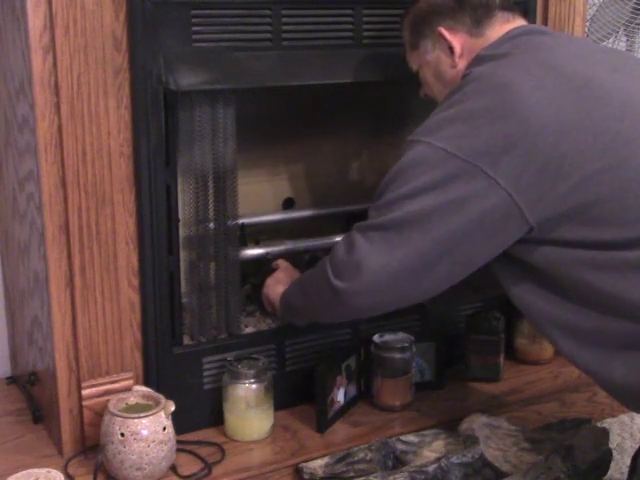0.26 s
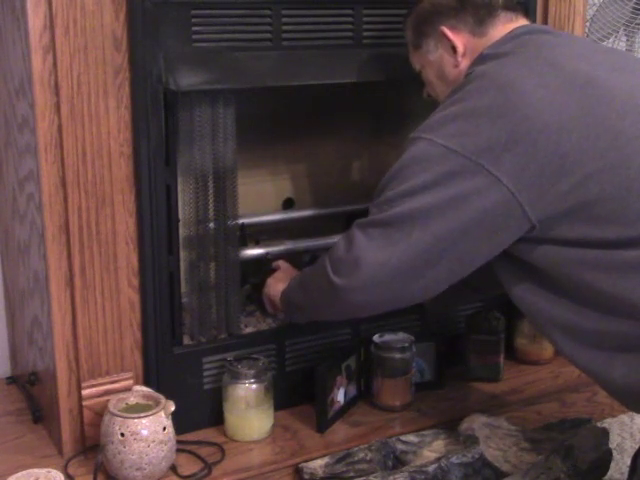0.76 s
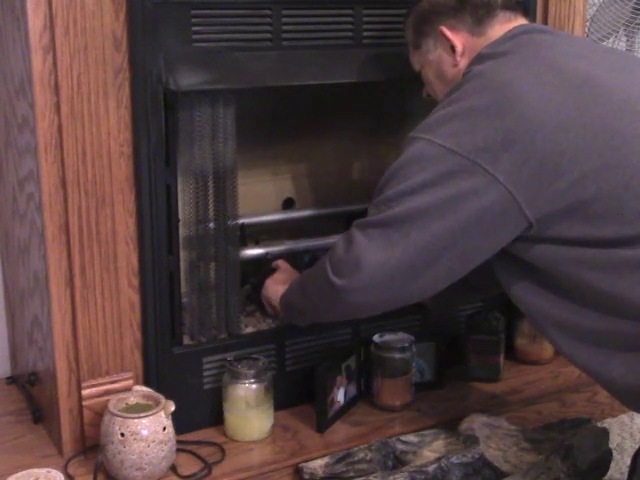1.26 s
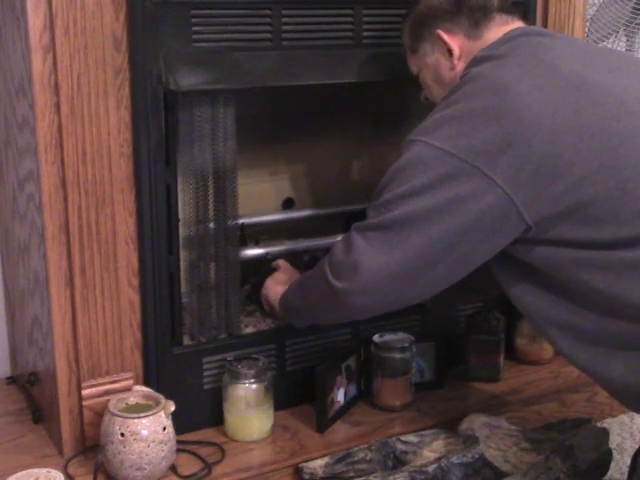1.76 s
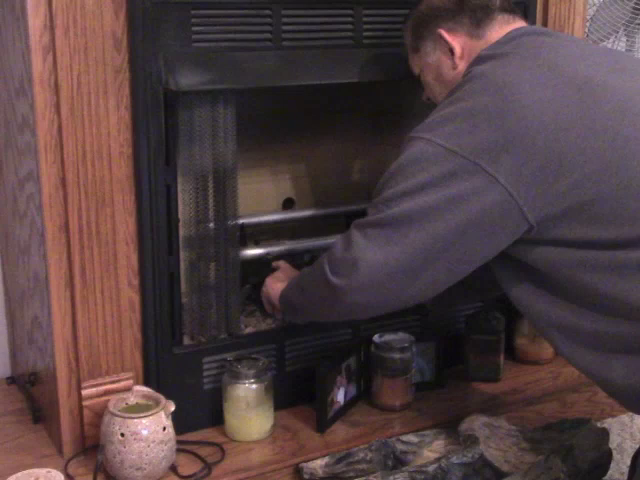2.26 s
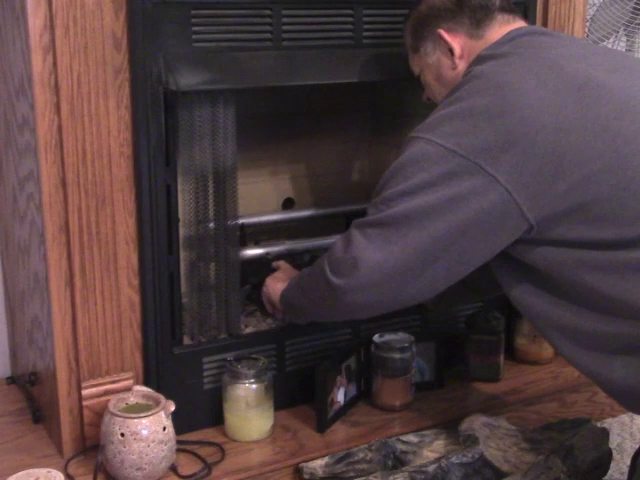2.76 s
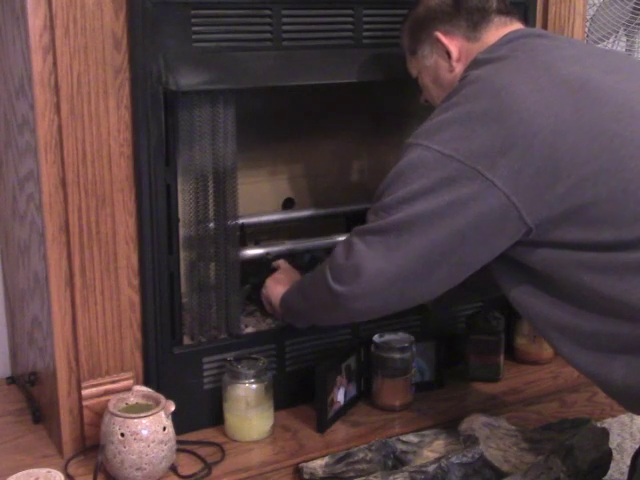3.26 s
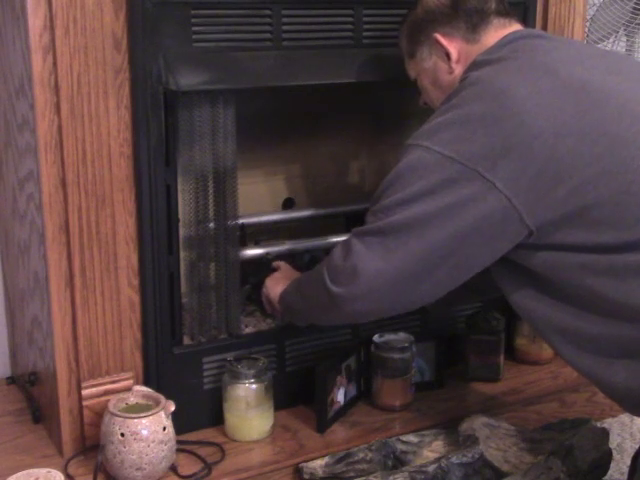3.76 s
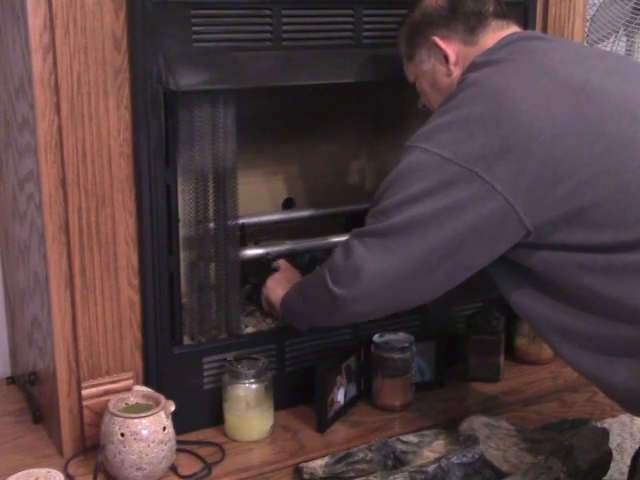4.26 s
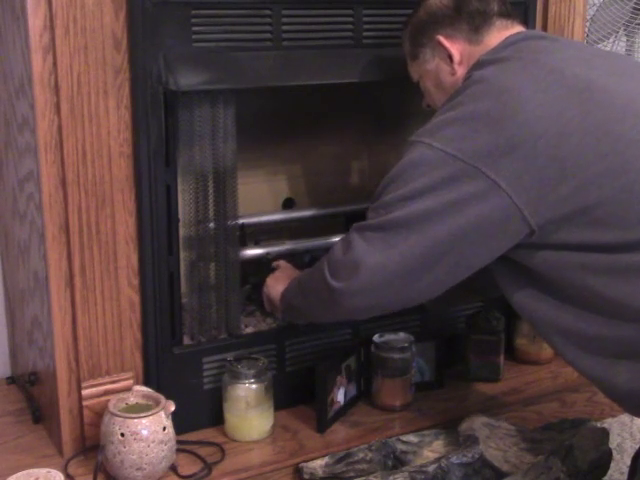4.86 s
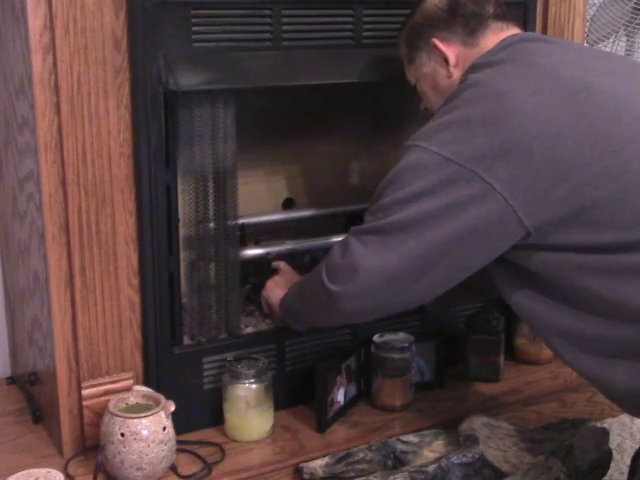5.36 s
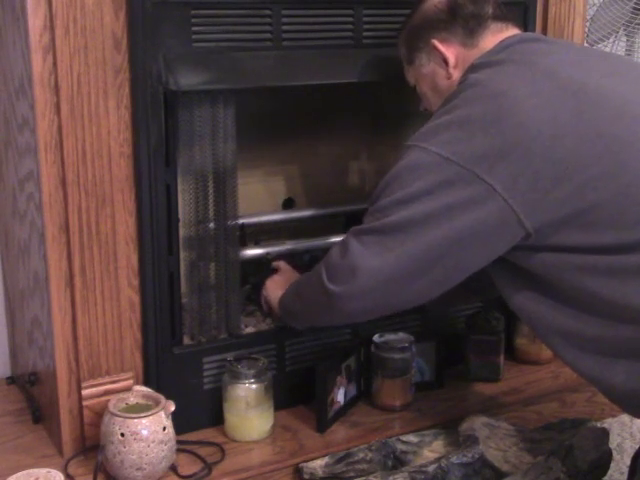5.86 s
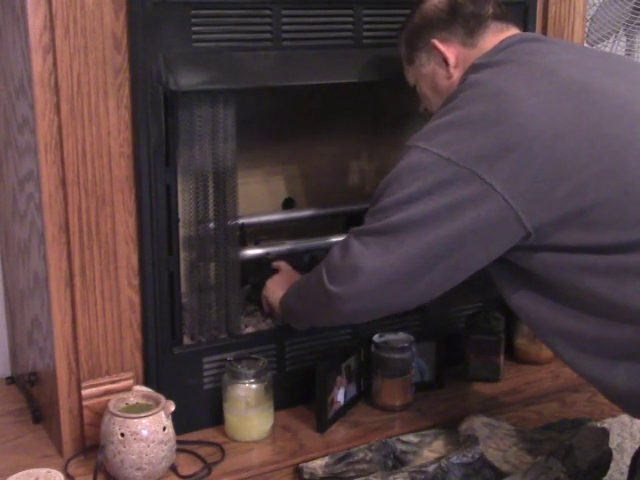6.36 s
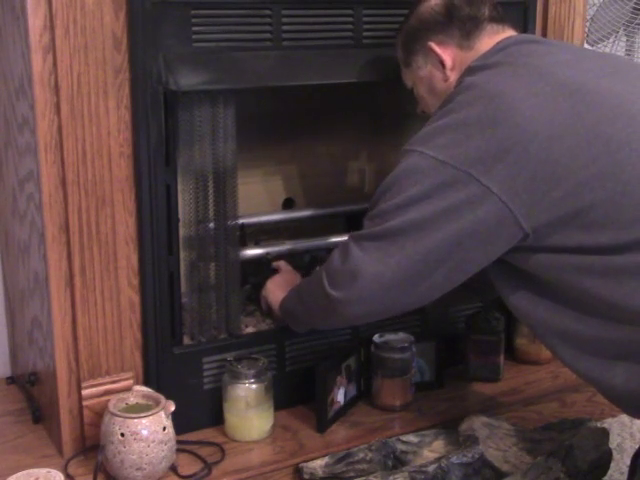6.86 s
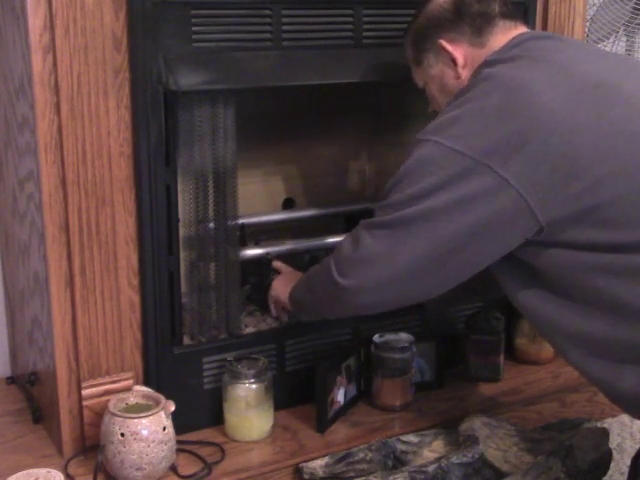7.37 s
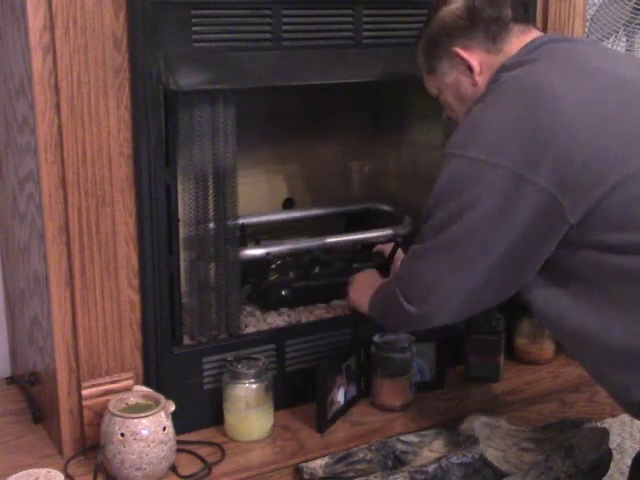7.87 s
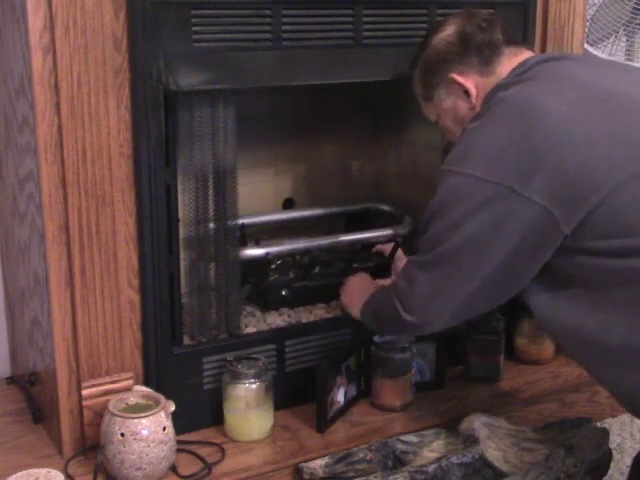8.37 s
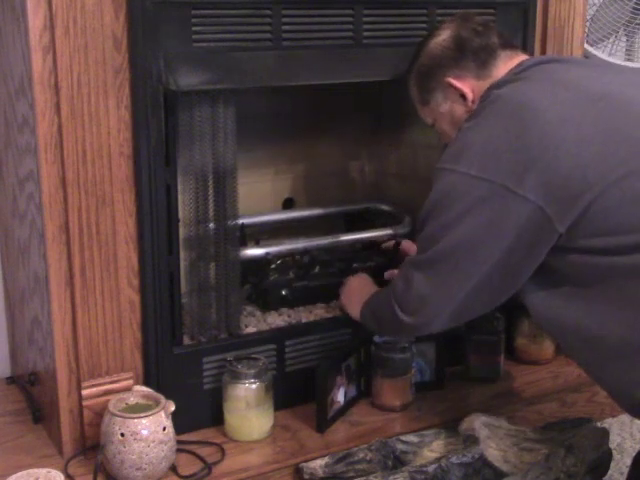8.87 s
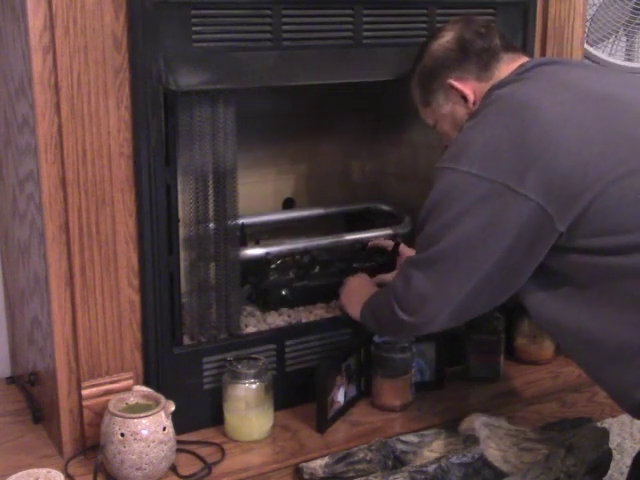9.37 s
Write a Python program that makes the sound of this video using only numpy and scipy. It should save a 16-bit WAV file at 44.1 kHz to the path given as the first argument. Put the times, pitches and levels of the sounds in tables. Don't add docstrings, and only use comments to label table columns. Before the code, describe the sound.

A spring-loaded spark igniter snaps sharply six times in a metal firebox, with soft release clacks, faint knob handling and low room hiss.

```python
import sys
import numpy as np
from scipy import signal
from scipy.io import wavfile
from scipy.ndimage import uniform_filter1d

SR = 44100
rng = np.random.default_rng(int(sys.argv[2]) if len(sys.argv) > 2 else 0)


def store_pcm(level_fs):
    pcm = np.round(np.clip(level_fs, -1, 1) * 32767).astype(np.int16)
    wavfile.write(sys.argv[1], SR, np.atleast_2d(pcm).T)


def magnitude_from_level(level_db):
    exponent = np.asarray(level_db, float) / 20
    return 10 ** exponent


N = 424241

# start_s, peak_db
SNAPS = [
    (0.015, 4),
    (1.531, 4),
    (3.349, 3),
    (4.068, 2.5),
    (5.538, 2),
    (6.726, 3),
]
# freq_hz, density_db (per Hz)
CRACK = [(350, -52), (600, -22.5), (1640, -5), (3120, -9.5), (3780, -4), (4460, -5), (5500, -9),
         (6200, 2.5), (7310, -15), (8050, -6), (10600, -11.5), (14300, -23), (16000, -29.5)]
RING_HZ = [1437, 1460, 1690, 1888, 2415, 3010, 3074, 4215, 6066, 775, 800, 748, 1040, 372, 345, 358, 496,
           522, 6842, 6853, 8100, 9900, 11700, 2115, 3960]
# level_db, t60_s
RING_SIZE = [(-24.5, 0.086), (-32.5, 0.25), (-29.5, 0.32), (-21, 0.26), (-31.5, 0.19), (-24, 0.19),
             (-28, 0.38), (-31, 0.086), (-26, .04), (-38, 0.6), (-36, 0.49), (-40, 0.15), (-42.5, 0.6),
             (-35, 0.41), (-45, 1.4), (-48, 1), (-34, .4), (-44, 0.4), (-51, 0.69), (-56.5, .6),
             (-29.5, .03), (-31.5, .03), (-33, 0.07), (-34, 0.18), (-32, .06)]
# freq_hz, width_hz, lift_db
PANELS = [(195, 30, 5), (362, 45, 10.5), (485, 40, 8.5), (779.4, 53, 14.5), (1031, 70, 10.5),
          (1444, 88, 13.5), (1696, 200, 12), (1883, 48, 15), (2130, 50, 8), (2413, 100, 8.5),
          (3024, 400, 9), (4210, 630, 7.5), (5080, 130, 6), (5930, 730, 4), (8040, 240, 3),
          (11400, 600, 3.5)]
# freq_hz, level_db
ROOM_COLOUR = [(80, -50.5), (125, -18), (250, -11), (500, -9.5), (1000, -6.5), (2000, -9), (4000, -7.5),
               (6500, -6), (9000, -11.5), (13000, -19.5), (15000, -24), (16500, -35)]
# freq_hz, t60_s
ROOM_T60 = [(100, 0.99), (260, 0.99), (700, 0.61), (1840, 0.37), (4850, 0.37), (9000, .31), (13000, 0.32),
            (16000, .2)]
# freq_hz, rise_s
ROOM_RISE = [(100, .05), (400, 0.015), (800, 0.027), (1500, 0.027), (6000, 0.0021)]
# delay_s, level_db
WALL = [(.043, -4), (0.0458, -6.5), (.051, -10), (0.057, -12.5), (0.084, -17.5), (0.097, -24.5)]
# freq_hz, level_db
WALL_COLOUR = [(300, -20), (1000, -2.5), (3000, -6.5), (4100, 1.5), (5600, -4.5), (9000, -12.5),
               (15000, -3)]
# start_s, peak_db, tilt_db (brightness per octave), thump_db
RELEASES = [
    (0.368, -25, 2.5, -4),
    (1.8772, -23.5, 2, -4.5),
    (3.694, -27.5, 0.3, -0.5),
    (4.6089, -28.5, 0, -4),
    (5.8653, -35, -3.5, -23.5),
    (6.0136, -26, -2, -12.5),
    (7.2654, -22.5, 1.3, -4.5),
]
# freq_hz, density_db (per Hz)
CLACK = [(150, -33.5), (250, 3.5), (988, -9), (1670, -3.5), (2670, -9), (3170, -1), (3800, -3.5),
         (5070, -9.5), (6040, -7), (7980, -10.5), (10500, -16), (14400, -32), (16000, -41.5)]
# freq_hz, level_db, t60_s
BUTTON = [(359, -32.5, .4), (525, -28.5, .25), (1000, -33.5, 0.21), (1440, -34, 0.14), (1680, -34, 0.2),
          (1920, -35, 0.2), (2310, -39, 0.23), (2448, -30, 0.11), (3110, -31, 0.15), (3980, -33, 0.1),
          (7800, -36, 0.051)]
# start_s, level_db, centre_hz
BUMPS = [
    (.585, -40, 350),
    (.755, -27.5, 1000),
    (.765, -26, 453),
    (6.178, -36.5, 1520),
    (8.135, -39, 500),
]
# start_s, peak_db, centre_hz, length_s
TICKS = [(0.758, -47, 900, .01), (7.443, -54, 6960, 0.0057), (6.177, -55, 1400, 0.013),
         (8.074, -58, 6860, 0.012), (8.1846, -46, 6800, 0.012), (8.186, -48.5, 1000, 0.015),
         (8.392, -66, 10000, .008), (8.454, -56, 900, .006), (8.702, -55, 8500, 0.006),
         (8.746, -64, 5000, .008), (8.786, -50, 2200, 0.0055)]
# start_s, level_db, length_s, centre_hz, ring (shaft share, a ratio)
RUBS = [
    (7.445, -61, .07, 7500, 0.99),
    (8.074, -52, 0.1, 1190, .05),
    (8.741, -56.5, 0.057, 1400, .05),
    (8.783, -61, 0.047, 2500, 2.9),
    (8.88, -69, 0.077, 8500, 1.3),
    (8.944, -63, 0.049, 2200, 0.38),
    (9.127, -70.5, .075, 9000, 2.5),
    (9.285, -64.5, 0.05, 6500, 0.5),
]
# freq_hz, width_hz, level_db
SHAFT = [(1860, 83, 6), (2480, 60, 7), (2970, 40, -4), (3590, 40, -2), (4150, 68, 0), (5250, 40, -13),
         (6260, 90, 5.5), (9650, 200, -2), (11600, 200, -12)]
# start_s, level_db, length_s
CRICKET = [
    (0.97, -74, 0.06),
    (1.107, -75, .07),
    (2.462, -79, 0.082),
    (2.58, -81, 0.035),
    (3.24, -76.5, .08),
    (4.718, -80, 0.092),
    (4.85, -81, .07),
]
# freq_hz, density_db (per Hz)
HISS = [(20, -6), (75, -21), (121, -3), (258, -4.5), (350, -1), (521, -6.5), (966, -5.5), (1140, -11),
        (1900, -13), (3500, -20), (7000, -26), (11000, -33.5), (14000, -40), (16500, -48.5)]
# freq_hz, level_db
WHINES = [(360.7, -69.5), (974.4, -75), (1545, -75.5), (1820, -82.5), (2148, -76.5)]
# start_s, peak_db
DRIVE = [
    (0.2574, -47.5),
    (3.8247, -52.5),
    (4.3824, -44.5),
    (5.9843, -44),
]
FIRM_BEATS = [35, 41, 49, 68, 78, 93, 94, 105, 112, 120, 126, 130, 132, 133, 140, 141, 142, 143]


def evened(x):
    return x / np.sqrt(np.mean(x ** 2) + 1e-20)


def at_peak(x, db):
    return magnitude_from_level(db) * x / np.sqrt(np.max(uniform_filter1d(x ** 2, size=170)))


def add(mix, start_s, sound):
    part = mix[round(start_s * SR):][:len(sound)]
    part += sound[:len(part)]


def read(points, hz):
    f, value = np.transpose(points)
    return np.interp(np.log(hz + 1), np.log(f + 1), value)


def colour(x, points, size=4096):
    gain_db = np.maximum(read(points, abs(np.fft.fftfreq(size, 1 / SR))), -100)
    log_spectrum = np.conj(signal.hilbert(np.log(magnitude_from_level(gain_db))))
    return signal.fftconvolve(x, np.fft.ifft(np.exp(log_spectrum)).real)


def knock(points):
    return colour(np.ones(1), points)


def bell(centre_hz, spread_octaves):
    hz = np.geomspace(100, 20000, 40)
    hump_db = -6 * (np.log2(hz / centre_hz) / spread_octaves) ** 2
    return np.transpose([hz, hump_db - 5.0 * (hz / 12000) ** 4])


def rattle(noise, length_s):
    t = np.arange(len(noise)) / SR
    return noise * np.exp(-(t / length_s) ** 2)


def rings(modes, rise_cycles):
    t = np.arange(2 * SR) / SR
    out = np.zeros(len(t))
    for hz, db, t60_s in modes:
        envelope = magnitude_from_level(db - 60 * t / t60_s) * (1 - np.exp(-t * hz / rise_cycles))
        out += envelope * np.sin(2 * np.pi * (hz * t + rng.random()))
    return out


def snaps():
    crack, blows = np.zeros((2, N))
    shared = rng.standard_normal(800)
    shared[0] = 4.5
    latch = colour(rattle(shared, 0.0012), bell(1500, 0.6))
    impulse = np.arange(800) == 0
    for start_s, db in SNAPS:
        own = rng.standard_normal(800)
        hammer = colour(rattle(shared + 0.33 * own, 0.0071), CRACK)
        add(crack, start_s, at_peak(hammer, db - 4.5))
        add(crack, start_s - 0.002, at_peak(latch, db - 41))
        add(blows, start_s, magnitude_from_level(db) * impulse + magnitude_from_level(db - 28) * rattle(own, 0.001))
    return crack, blows


def firebox():
    return magnitude_from_level(5.5) * rings(np.column_stack([RING_HZ, RING_SIZE]), 2.5)


def tail():
    hz, t, z = signal.stft(rng.standard_normal(2 * SR), SR, nperseg=256, noverlap=192)
    build = 1 - np.exp(-(t / read(ROOM_RISE, hz)[:, None]) ** 2)
    decay = magnitude_from_level(-60 * t / read(ROOM_T60, hz)[:, None])
    shiver = magnitude_from_level(6.5 - 60 * t / 0.029)
    diffuse = signal.istft(z * build * (decay + shiver), SR, nperseg=256, noverlap=192)[1]
    fine_hz = np.geomspace(50, 20000, 700)
    lift_db = sum(db / (1 + (2 * (fine_hz - f) / width) ** 2) for f, width, db in PANELS)
    return colour(diffuse, np.transpose([fine_hz, lift_db]))


def wall():
    response = np.zeros(SR // 4)
    response[0] = 1
    slap = knock(WALL_COLOUR)
    for delay_s, db in WALL:
        add(response, delay_s, magnitude_from_level(db) * slap)
    return response


def releases():
    clacks, knocks, stops = np.zeros((3, N))
    hz, clack_db = np.transpose(CLACK)
    t = np.arange(2000) / SR
    tick_s, seat_s, seat_hz = 0.0067, 0.0041, 4500
    tick_shape = np.minimum(t / 0.0012, 1) * np.exp(-t / tick_s)
    seat_shape = t / seat_s * np.exp(-t / seat_s)
    less_low, less_high = np.outer(hz < seat_hz, [0, -14]), np.outer(hz > seat_hz, [0, -12])
    for start_s, db, tilt, thump_db in RELEASES:
        tilt_db = tilt * np.log2(np.minimum(hz, 6000) / 3000)
        spectrum = np.transpose([hz, clack_db + tilt_db - 9.06 * (hz < 900)])
        grit = rng.standard_normal(2000)
        tick = colour(grit * tick_shape, spectrum + less_low)
        seat = colour(grit * seat_shape, spectrum + less_high)
        add(clacks, start_s - 0.0008, at_peak(magnitude_from_level(2.5) * tick + 2.9 * seat, db - 5.5))
        thump = magnitude_from_level(thump_db + 9.5) * knock(bell(500, 1.0))
        add(knocks, start_s + 0.003, magnitude_from_level(db) * (knock(spectrum) + thump))
        stop = [(300, -3.0 * tilt + thump_db), (3000, -2.5), (12000, 3.2 * tilt)]
        add(stops, start_s + 0.003, magnitude_from_level(db) * knock(stop))
    return clacks, knocks, stops


def button_mount():
    return magnitude_from_level(18.0) * rings(BUTTON, 3.1)


def bumps():
    out = np.zeros(N)
    for start_s, db, centre_hz in BUMPS:
        add(out, start_s, magnitude_from_level(db) * knock(bell(centre_hz, 0.65)))
    return out


def knob_ticks():
    ticks, taps = np.zeros((2, N))
    for start_s, db, centre_hz, length_s in TICKS:
        hump = bell(centre_hz, 1.3 - 0.15 * np.log2(centre_hz / 1000))
        add(ticks, start_s, at_peak(colour(rattle(rng.standard_normal(2500), length_s), hump), db))
        add(taps, start_s, magnitude_from_level(db) * knock(hump))
    return ticks, taps


def knob_rubs():
    out, t = np.zeros(N), np.arange(1500) / SR
    shaft = sum(magnitude_from_level(db) * np.exp(-np.pi * width * t) * np.sin(2 * np.pi * hz * t) for hz, width, db in SHAFT)
    for start_s, db, length_s, centre_hz, ring in RUBS:
        grit, slip = rng.standard_normal((2, round(length_s * SR)))
        stroke = np.sin(np.pi * np.linspace(0, 1, len(grit)) ** 0.54)
        grit = grit * magnitude_from_level(2.7 * abs(slip)) * stroke
        add(out, start_s, at_peak(colour(grit, bell(centre_hz, 1.2)), db))
        add(out, start_s, ring * at_peak(np.convolve(grit, shaft), db))
    return out


def cricket():
    out = np.zeros(N)
    for start_s, db, length_s in CRICKET:
        t = np.arange(round(length_s * SR)) / SR
        note = np.sin(2 * np.pi * 5561 * t) * signal.windows.tukey(len(t), 0.5)
        add(out, start_s, magnitude_from_level(db) * note)
    return out


def camera_drive():
    out, t = np.zeros(N), np.arange(400) / SR
    phase = 2 * np.pi * 2000 * t + 1.1 * np.sin(2 * np.pi * 130 * t)
    blip = at_peak(np.sin(phase) * t * np.exp(-t / 0.0012), 0)
    beats = np.arange(0.047, N / SR, 1.001 / 15)
    firm = np.isin(np.arange(len(beats)), FIRM_BEATS)
    scatter_db = 3.5 * rng.standard_normal(len(beats)) * np.where(firm, 0.5, 1)
    level_db = np.where(firm, -54, -69) + scatter_db
    for start_s, db in [*zip(beats, level_db), *DRIVE]:
        add(out, start_s, magnitude_from_level(db - 3.5) * blip)
    return out


def appliance_tones():
    out, t = np.zeros(N), np.arange(N) / SR
    for hz, db in WHINES:
        drift = uniform_filter1d(rng.standard_normal(N), size=6000)
        waver = evened(uniform_filter1d(drift, size=3000))
        out += magnitude_from_level(db) * waver * np.sin(2 * np.pi * hz * t)
    return out


def room_tone():
    frames, hz = N // 256 + 5, np.fft.rfftfreq(1024, 1 / SR)
    a, b, patches = rng.standard_normal((frames, 513, 3)).T
    patches = uniform_filter1d(patches, size=10, axis=0)
    patches_db = evened(uniform_filter1d(patches, size=14, axis=1))
    z = (a + 1j * b) * magnitude_from_level(read(HISS, hz)[:, None] + patches_db)
    return magnitude_from_level(-57.5) * evened(signal.istft(z, nperseg=1024, noverlap=768)[1][:N])


def scene():
    crack, blows = snaps()
    clacks, knocks, stops = releases()
    ticks, taps = knob_ticks()
    diffuse = tail()
    direct = signal.fftconvolve(crack + 0.28 * clacks, wall())[:N]
    direct += 0.44 * clacks + ticks + knob_rubs()
    room = magnitude_from_level(-7.5) * colour(diffuse, ROOM_COLOUR)[:2 * SR]
    ringing = signal.fftconvolve(blows + bumps(), firebox() + room)[:N]
    ringing += signal.fftconvolve(stops, button_mount())[:N]
    wet = signal.fftconvolve(magnitude_from_level(-13) * knocks + magnitude_from_level(-4.5) * taps, diffuse)[:N]
    background = cricket() + camera_drive() + appliance_tones() + room_tone()
    return (direct + ringing + wet + background)[None]


def band_limit(x):
    return signal.sosfilt(signal.butter(12, 16850, fs=SR, output="sos"), x)


def record(dry):
    level_db = 10 * np.log10(signal.lfilter([0.03], [1, -0.97], dry[0] ** 2) + 1e-12)
    fall_db = np.arange(N) * 250 / SR
    held_level_db = np.maximum.accumulate(level_db + fall_db) - fall_db
    over_db = np.maximum(held_level_db + 5.5, 0)
    held = dry / magnitude_from_level(0.6 * over_db)
    rounded = 0.84 * np.tanh(held / 0.84)
    coupled = signal.lfilter(*signal.butter(1, 90, "high", fs=SR), rounded)
    top_edge = signal.firwin(511, 15850, window=("kaiser", 9), fs=SR)[None]
    mix = signal.oaconvolve(coupled, top_edge, "same")
    return band_limit(mix)


dry = scene()
out = record(dry)
store_pcm(out)
```